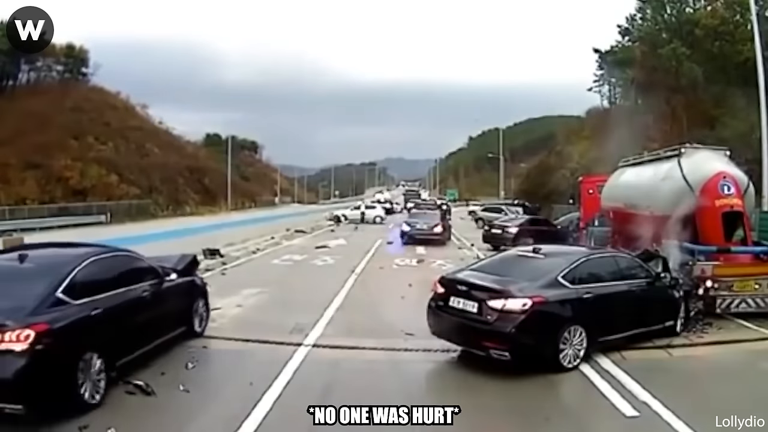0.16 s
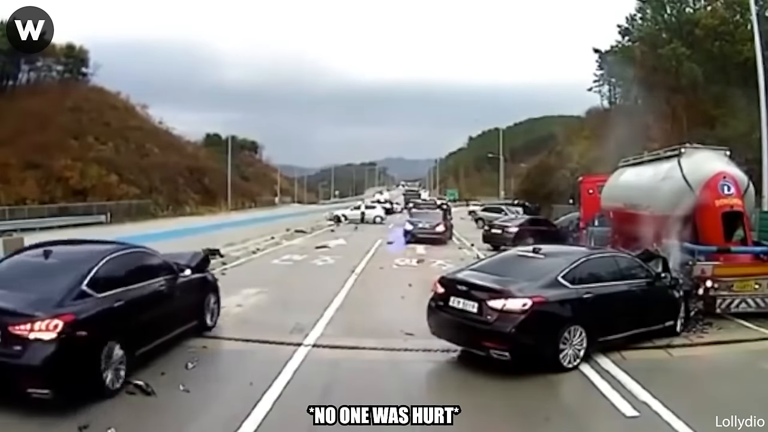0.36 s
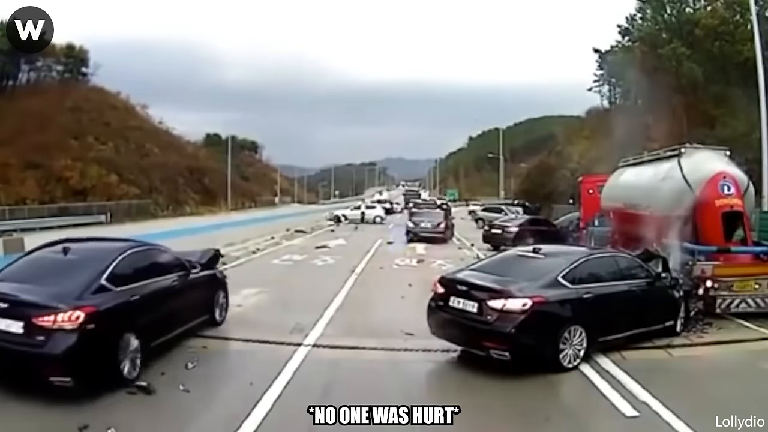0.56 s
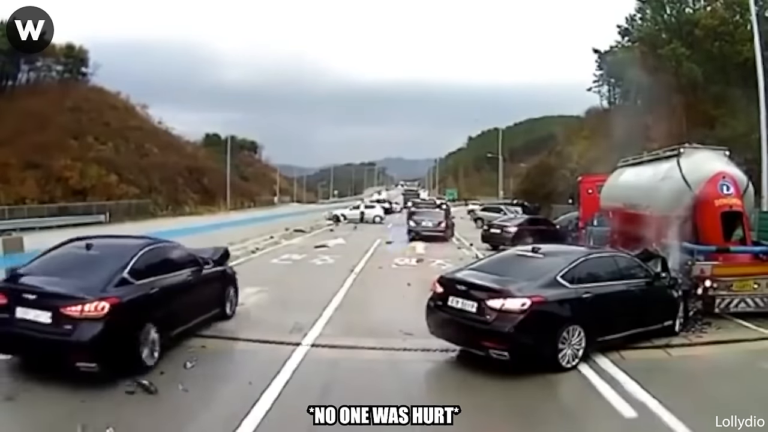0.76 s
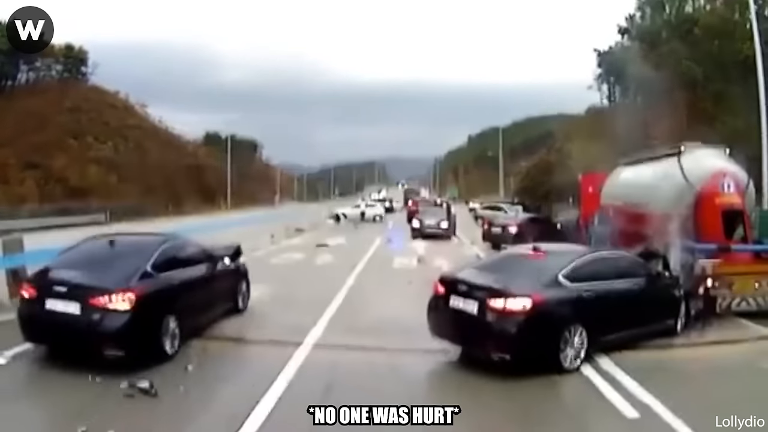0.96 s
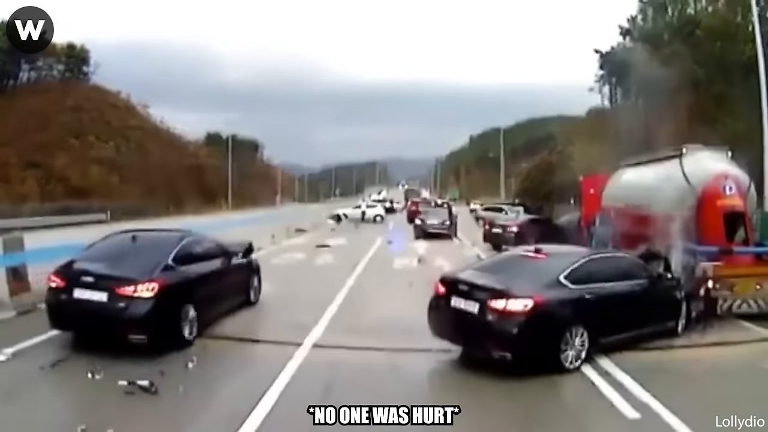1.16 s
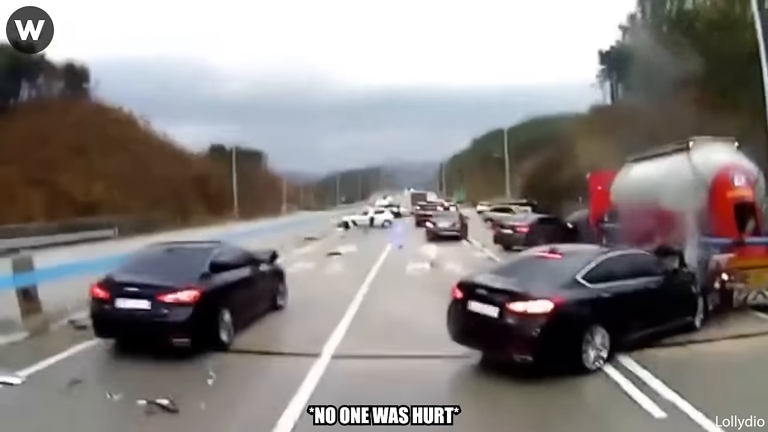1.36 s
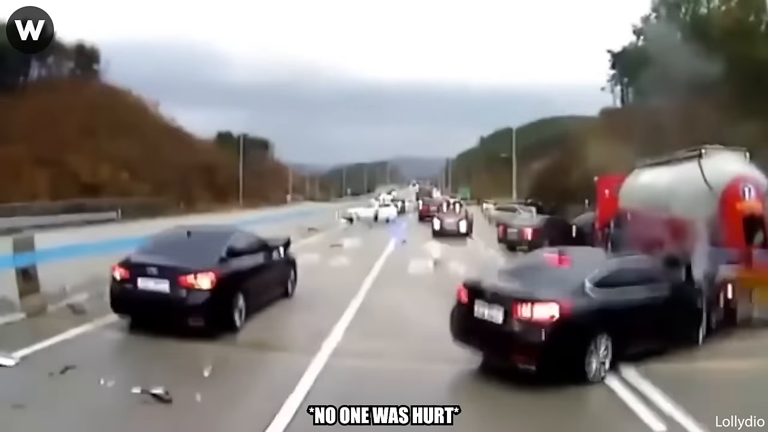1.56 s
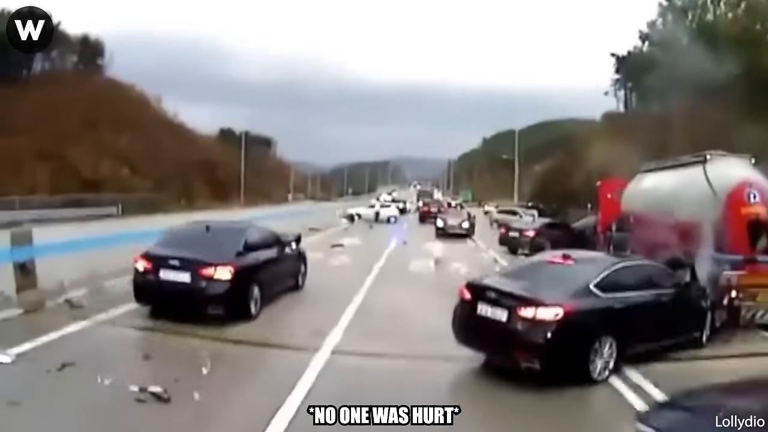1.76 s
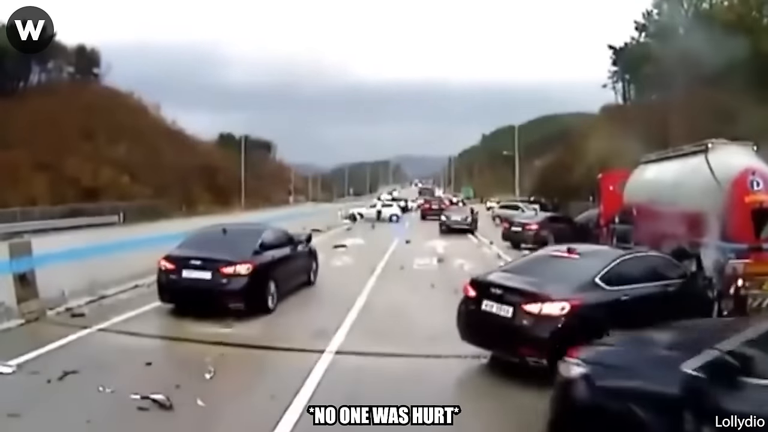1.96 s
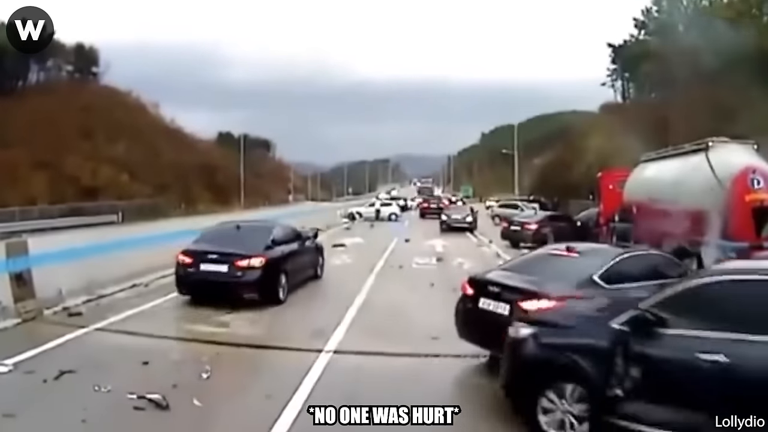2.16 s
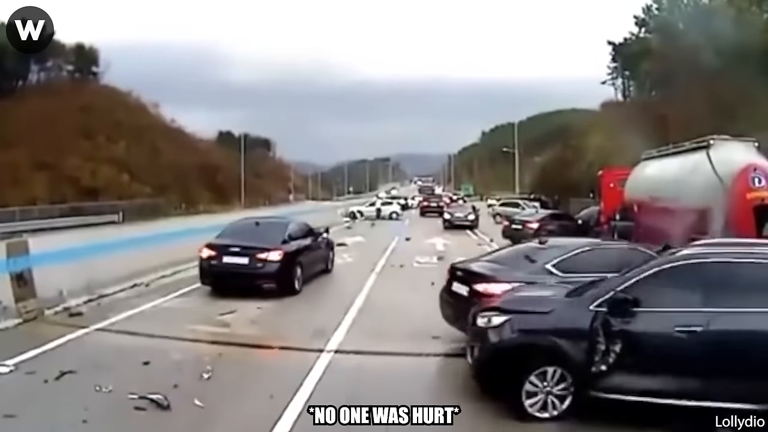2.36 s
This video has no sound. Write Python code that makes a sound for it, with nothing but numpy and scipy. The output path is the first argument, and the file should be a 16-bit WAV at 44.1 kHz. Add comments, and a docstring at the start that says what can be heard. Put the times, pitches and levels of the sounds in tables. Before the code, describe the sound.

Car tyres squeal in a locked-wheel skid on asphalt, then a crash with crumpling metal and shattering glass

```python
"""A car slides with locked wheels, then crashes. Over faint hiss, coloured noise and grit make the scrub and
rumble of rubber on asphalt; a small clack rings a few modes. Tread blocks then stick and slip: wavering
partials give a high tyre, a bright squeal, a low hoarse tyre and short squeaks, with a dull noise-tail echo.
The slide dies away. The crash is banded noise for the panels, struck modes for the body, and single
thuds and ringing shards within a shower of glass."""
import sys
import numpy as np
from scipy import signal
from scipy.io import wavfile
from scipy.ndimage import uniform_filter1d

SR = 44100
rng = np.random.default_rng(int(sys.argv[2]) if len(sys.argv) > 2 else 0)


def persist_wave(psi):
    """Save psi, clipped to +-1, as 16-bit WAV."""
    counts = np.round(np.clip(psi, -1, 1) * 32767).astype(np.int16)
    wavfile.write(sys.argv[1], SR, np.atleast_2d(counts).T)


def ratio_of_db(decibels):
    """Turn decibels (scalar or array-like) into linear amplitude factors; 0 dB maps to 1."""
    return 10 ** (np.asarray(decibels, float) / 20)


N = 110250

# background hiss: (frequency [Hz], relative density [dB per Hz])
HISS_COLOUR = [(18, -30), (30, 0), (71, -34), (180, -34), (1380, -36), (6660, -43.5), (8940, -63.5),
               (10600, -50), (13800, -100), (22000, -120)]
# scrub of rubber: (time [s], mid level before SCRUB_MID_GAIN_DB [dB], treble level [dB])
SCRUB_LEVELS = [(.045, -47, -54), (.085, -48, -59), (.11, -33, -50.5), (.25, -28, -37.5), (.31, -30.5, -42),
                (.55, -30, -40), (.83, -30, -37), (1.05, -29, -42.5), (1.28, -33.5, -51), (1.44, -35, -47),
                (1.54, -36, -49.5), (1.6, -49, -61), (1.65, -65, -73), (1.7, -53, -62)]
# scrub spectrum: (frequency [Hz], relative density [dB per Hz])
SCRUB_COLOUR = [(35, -59), (60, -6.5), (267, -7.5), (450, -6), (558, -3), (693, -2.5), (1000, -5),
                (1480, -8), (1920, -7), (2490, -8.5), (5090, -19.5), (10600, -51.5), (13800, -74.5),
                (22000, -120)]
# rumble of the carcass: (time [s], level [dB])
RUMBLE_LEVELS = [(0.04, -55), (0.094, -43), (0.118, -41), (0.206, -35.5), (0.658, -37), (1.08, -34),
                 (1.278, -41.5), (1.532, -41), (1.56, -45.5), (1.7, -45)]
# knock before the tyres sound: (time [s], relative level [dB])
CLACK_HITS = [(.047, -22)]
# modes of the knock: (frequency [Hz], relative level [dB], T60 [s])
CLACK_MODES = [(1097, -17.5, 0.14), (1360, -18.5, 0.16), (2170, -22, 0.072), (3130, -3.5, 0.036),
               (3310, -5, 0.052), (5130, -26, 0.069), (5600, -35, 0.044)]
# higher tyre: (time [s], slip pitch before detuning [Hz], relative level [dB])
HIGH_TYRE = [(0.15, 846.6, -33.5), (0.28, 1085, -24), (0.33, 1076, -28), (0.346, 1067, -24),
             (0.38, 1021, -43), (0.412, 1080, -21.5), (0.5, 999, -32.5), (0.55, 1000, -34),
             (0.632, 978, -29), (0.676, 972, -32), (0.764, 946.4, -23), (0.834, 1007, -36),
             (0.862, 984, -23.5), (0.99, 862.7, -26), (1.014, 865, -33), (1.064, 904, -24.5),
             (1.274, 923.4, -25), (1.366, 947, -27), (1.45, 945, -26.5), (1.5, 867.6, -26),
             (1.612, 843, -27), (1.64, 843, -39), (1.7, 843, -53)]
# its 2nd to 4th partials: (level against the 1st [dB])
HIGH_OVERTONES_DB = [-9.5, -13.5, -29]
# its tread bands: (pitch ratio, gain [dB])
HIGH_DETUNE = [(.93, -13.5), (1.001, -1.5), (1.1, -7.5)]
# upper squeal: (time [s], pitch before detuning [Hz], relative level [dB])
SQUEAL = [(0.085, 1607, -49), (0.107, 1573, -19), (0.124, 1495, -22), (0.128, 1960, -37),
          (0.147, 1960, -25), (0.261, 1945, -26.5), (0.279, 2014, -33), (0.401, 1780, -29),
          (0.437, 1762, -29), (0.459, 1767, -22.5), (0.627, 1914, -40), (0.649, 1944, -24.5),
          (0.917, 1940, -24.5), (1.021, 1790, -24.5), (1.071, 1870, -23.5), (1.125, 1801, -21),
          (1.315, 1928, -26), (1.323, 1918, -17), (1.365, 1978, -24), (1.591, 1772, -23.5),
          (1.635, 1793, -46), (1.71, 1894, -51)]
# its tread bands: (pitch ratio, gain [dB])
SQUEAL_DETUNE = [(.93, -9.5), (1.001, -7), (1.07, -8.5)]
# low tyre first grips, pitch falling: (time [s], slip pitch [Hz], relative level [dB])
BITE = [(.07, 760, -49), (.09, 760.6, -31), (.1, 733.6, -23), (.114, 686, -27.5), (.13, 654, -10)]
# low tyre sliding: (time [s], slip pitch [Hz], relative level [dB])
LOW_TYRE = [(0.145, 582, -18.5), (0.383, 582, -22), (0.409, 586, -34), (0.443, 565, -26.5),
            (0.481, 583, -36), (0.595, 585, -18), (0.633, 592, -29.5), (0.719, 562, -22.5),
            (0.751, 583, -27), (0.837, 595, -19.5), (0.863, 592, -30), (1.053, 585, -31.5),
            (1.165, 601, -44), (1.335, 563, -28), (1.425, 564, -41), (1.525, 604, -36), (1.58, 572, -34.5),
            (1.7, 563, -54)]
# its 2nd to 4th partials: (level against the table level [dB])
LOW_OVERTONES_DB = [-17, -15.5, -22.5]
# short squeaks and gliding overtones of the tyres: (start [s], length [s], from [Hz], to [Hz], level [dB])
SQUEAKS = [(0.163, 0.03, 1737, 1700, -30), (.21, 0.027, 2123, 2280, -29), (0.237, 0.019, 1850, 1920, -21),
           (.25, 0.059, 2030, 2360, -29.5), (.32, 0.051, 2270, 2212, -36),
           (0.339, 0.048, 1660, 1593, -28.5), (0.449, 0.042, 1740, 1907, -28),
           (0.503, .06, 1735, 1704, -34), (0.694, 0.033, 2090, 2025, -31), (0.946, 0.072, 830, 782, -30),
           (1.09, 0.074, 1684, 1626, -27.5), (1.14, .05, 847, 800, -26.5), (1.528, 0.061, 1850, 1763, -29),
           (1.533, 0.037, 4460, 4550, -53)]
# crash, all but glass before CRUMPLE_GAIN_DB: (time [s], mid [dB], boom [dB], treble [dB], top [dB])
CRASH_LEVELS = [(1.716, -22, -16.5, -27.5, -44), (1.742, -21, -26, -26.5, -42.5),
                (1.822, -24, -24.5, -28.5, -38.5), (1.836, -20.5, -29, -22, -30),
                (1.874, -24, -23.5, -22, -27), (1.956, -20, -26.5, -23.5, -31.5),
                (2.004, -22.5, -26.5, -25, -26.5), (2.154, -26.5, -25, -28, -34.5),
                (2.172, -26.5, -25.5, -26.5, -33.5), (2.252, -23, -25.5, -26, -30),
                (2.34, -26.5, -25.5, -26, -27.5), (2.37, -26.5, -25, -29, -32),
                (2.486, -26, -26, -28, -36.5), (2.5, -27, -23.5, -25.5, -36)]
# crumpling spectrum: (frequency [Hz], relative density [dB per Hz])
CRASH_COLOUR = [(24, -47), (40, -66), (93, -2.5), (220, -5.5), (487, -1), (560, -2), (1160, -2.5),
                (1840, -6.5), (2120, -11.5), (5790, -21), (9230, -36.5), (10600, -24), (13800, -77),
                (22000, -120)]
# modes of the car body: (frequency [Hz], relative level [dB], T60 [s])
BODY_MODES = [(185, -3.5, 0.27), (234.3, 5, 0.15), (292, -3.5, 0.08), (346.4, -1.5, 0.13),
              (413, -4.5, 0.07), (493, -13, 0.12), (687, 0.5, 0.065), (859, 1.5, 0.068), (1003, -10, 0.066)]
# loudest thuds of the body: (time [s], frequency [Hz], peak [dB], shaken for [s])
THUDS = [(1.719, 368, -25, 0.02), (1.777, 372, -26, 0.06), (1.825, 462, -22, 0.018),
         (1.85, 180, -23.5, 0.039), (1.948, 188, -21, 0.011), (2.029, 195, -22, 0.022),
         (2.16, 238, -19.5, 0.014), (2.19, 317, -20, 0.024), (2.36, 203, -23.5, 0.033),
         (2.46, 340, -26, .02)]
# loudest ringing shards: (time [s], frequency [Hz], peak [dB], shaken for [s])
SHARDS = [(1.75, 1644, -27, .02), (1.853, 3800, -22, 0.0074), (1.876, 2620, -30, .008),
          (1.895, 2340, -31, .02), (1.972, 3390, -23.5, 0.017), (1.972, 2870, -30, 0.045),
          (1.99, 5750, -30, 0.043), (2.03, 2096, -25.5, 0.054), (2.175, 2704, -29, 0.028),
          (2.228, 2700, -26.5, 0.0092), (2.245, 4930, -33, 0.022), (2.26, 2260, -29, 0.016),
          (2.29, 1940, -31, .04), (2.315, 5010, -32, 0.026), (2.345, 3700, -31.5, 0.027)]
# treble that spreads wide: (from [s], to [s])
WIDE_SPANS = [(.09, .2), (0.242, 1.5), (1.711, 2.6)]
# faint air above the cut: (band edge [Hz])
AIR_HZ = [10900, 14300]
# steady offset, one row per channel, left then right: (offset [full scale])
OFFSET = [
    [.0188],
    [.0032],
]

HISS_DB = -53
SCRUB_MID_GAIN_DB, RUMBLE_TOP_HZ, SCRUB_TREBLE_FROM_HZ = 6, 490, 5000
CLACK_GAIN_DB = 1.0
SLIDE_END_S, SLIDE_FADE_S = 1.71, 0.033
ECHO_DB, ECHO_T60_S, ECHO_TOP_HZ = -16.5, 0.28, 2930
CRASH_S, CRUMPLE_GAIN_DB, BOOM_RISE_S = 1.7125, -1.0, 0.038
BOOM_TOP_HZ, TREBLE_FROM_HZ, TOP_FROM_HZ = 550, 2000, 4500
BODY_DB, BODY_BLOWS_PER_S = -27.5, 110
GLASS_PER_S, GLASS_CYCLES = 1200, 130   # T60 of a shard in cycles
GLASS_DB = -6   # against the treble level in CRASH_LEVELS
GLASS_TILT_DB = -3.5   # across the pitch range, low to high
SHARD_T60_S, THUD_T60_S, MODE_WANDER_HZ = 0.045, 0.057, 8
CUTOFF_HZ = 11240
WIDE_HZ, WIDE_DB = [4340, 7530], -2.5   # side against middle
WIDE_PATCHY = 0.99   # a slice fades out as its slow chance nears this
AIR_DB, AIR_HISS_DB = -24.5, -73   # against the band below the cut; absolute


def rms_one(x):
    """Scale to rms 1."""
    return x / np.sqrt(np.mean(x ** 2) + 1e-20)


def in_time(rows):
    """Columns of a table, one value per sample."""
    s, *columns = np.transpose(rows)
    return [np.interp(np.arange(N) / SR, s, c) for c in columns]


def between(start_s, end_s, fade_s):
    """Gate with short straight fades."""
    t = np.arange(N) / SR
    return np.clip(np.minimum(t - start_s, end_s - t) / fade_s, 0, 1)


def drift(rate_hz):
    """Slow chance of spread 1: noise through a two-pole low-pass."""
    r = np.exp(-2 * np.pi * rate_hz / SR)
    noise = rng.standard_normal(N + SR)   # first second settles the filter
    return rms_one(signal.lfilter([1], [1, -2 * r, r * r], noise)[SR:])


def band_pass(x, order, edges_hz):
    """Butterworth band-pass."""
    return signal.sosfilt(signal.butter(order, edges_hz, "band", fs=SR, output="sos"), x)


def ring(clicks, hz, t60_s):
    """Resonator: a unit click sets a sine of height 1 ringing."""
    r = ratio_of_db(-60 / (t60_s * SR))
    w = 2 * np.pi * hz / SR
    return signal.lfilter([0, np.sin(w)], [1, -2 * r * np.cos(w), r * r], clicks + 1e-18)


def grains(per_s, spread_db):
    """Random clicks of uneven size and sign."""
    sizes = ratio_of_db(spread_db * np.minimum(rng.exponential(1, N), 3)) * rng.choice([-1, 1], N)
    return sizes * (rng.random(N) < per_s / SR)


def gritty_noise(grain_gain):
    """Two white noises strewn with clicks."""
    return rng.standard_normal((2, N)) + grain_gain * np.array([grains(1500, 4), grains(1500, 4)])


def bands(x, colour, patchy_db, rate_hz):
    """Third-octave bands dealt in turn from two sources, each with its level and flicker."""
    edges = 30 * 2 ** np.arange(0, 9.1, 1 / 3)
    centres = np.sqrt(edges[1:] * edges[:-1])
    colour_hz, colour_db = np.transpose(colour)
    level_db = np.interp(np.log(centres), np.log(colour_hz), colour_db)
    parts = [ratio_of_db(level_db[k] + patchy_db * drift(rate_hz)) * band_pass(x[k % 2], 2, edges[k:k + 2])
             for k in range(len(centres))]
    return centres, np.array(parts)


def registers(centres, parts, layers):
    """Sum the bands in registers (from Hz, to Hz, level dB), each levelled on its own."""
    out = 0
    for low_hz, high_hz, db in layers:
        inside = (centres >= low_hz) & (centres < high_hz)
        out = out + ratio_of_db(db) * rms_one(parts[inside].sum(axis=0))
    return out


def slip(hz, partials_db, wobble, rough, flutter_db):
    """Stick-slip of tread blocks: partials on one wavering phase, each fluttering in strength."""
    waver = 1 + wobble * drift(25.3) + rough * drift(143.9)
    phase = 2 * np.pi * np.cumsum(hz * waver) / SR
    out = 0
    for k, db in enumerate(partials_db, start=1):
        flutter = flutter_db * np.minimum(drift(31), 0.8)
        out = out + np.sqrt(2) * ratio_of_db(db + flutter) * np.sin(k * phase)
    return out


def shaken(start_s, hz, db, length_s, t60_s):
    """One mode kept ringing unevenly while shaken, then dying."""
    t = np.arange(N) / SR
    decay_db = 60 * np.maximum(t - start_s - length_s, 0) / t60_s
    rise = between(start_s, 3, 1.5 / hz + 0.0019)
    phase = 2 * np.pi * np.cumsum(hz + MODE_WANDER_HZ * drift(40)) / SR
    return rise * ratio_of_db(db + 2.0 * drift(34) - decay_db) * np.sin(phase)


def noise_following(x, from_hz, to_hz, count, patchy):
    """Noise in band to_hz follows, slice by slice, the level of x in from_hz; slices come and go."""
    out = 0
    heard_edges = np.geomspace(*from_hz, num=count + 1)
    noise_edges = np.geomspace(*to_hz, num=count + 1)
    for k in range(count):
        heard = band_pass(x, 4, heard_edges[k:k + 2])
        noise = band_pass(rng.standard_normal(N), 6, noise_edges[k:k + 2])
        on = np.clip(4 * (patchy - drift(2.5)), 0, 1)
        level = np.sqrt(np.abs(uniform_filter1d(heard ** 2, size=700)))
        out = out + on * level * rms_one(noise)
    return out


def background_hiss():
    """Faint flickering noise under everything."""
    _, parts = bands(rng.standard_normal((2, N)), HISS_COLOUR, patchy_db=3.0, rate_hz=7.2)
    return ratio_of_db(HISS_DB) * rms_one(parts.sum(axis=0))


def scrub():
    """Dense grit tearing under the rubber, and the rumble of the carcass."""
    mid_db, treble_db = in_time(SCRUB_LEVELS)
    rumble_db, = in_time(RUMBLE_LEVELS)
    centres, parts = bands(gritty_noise(0.22), SCRUB_COLOUR, patchy_db=2.0, rate_hz=15.5)
    layers = [(0, RUMBLE_TOP_HZ, rumble_db),
              (RUMBLE_TOP_HZ, SCRUB_TREBLE_FROM_HZ, mid_db + SCRUB_MID_GAIN_DB + 0.9 * drift(5.9)),
              (SCRUB_TREBLE_FROM_HZ, SR, treble_db)]
    return between(0.042, CRASH_S, 0.007) * registers(centres, parts, layers)


def clack():
    """A small knock: a click rings the modes, softened by a fade-in of about a millisecond."""
    clicks = np.zeros(N)
    for s, db in CLACK_HITS:
        clicks[int(s * SR)] = ratio_of_db(db + CLACK_GAIN_DB)
    rings = sum(ratio_of_db(db) * ring(clicks, hz, t60_s) for hz, db, t60_s in CLACK_MODES)
    return rings * between(CLACK_HITS[0][0], 3, 0.0014)


def squeal():
    """Bright stick-slip of several tread bands, about an octave above the higher tyre."""
    hz, db = in_time(SQUEAL)
    out = sum(slip(hz * ratio, [db + gain, db + gain - 39.5], wobble=0.024, rough=0.02024, flutter_db=7.5)
              for ratio, gain in SQUEAL_DETUNE)
    return between(0.069, CRASH_S, 0.0036) * out


def high_tyre():
    """Stick-slip of a higher tyre in several detuned tread bands."""
    hz, db = in_time(HIGH_TYRE)
    out = 0
    for ratio, gain in HIGH_DETUNE:
        partials_db = [db + gain + o for o in [0] + list(HIGH_OVERTONES_DB)]
        out = out + slip(hz * ratio, partials_db, wobble=0.027, rough=0.0281, flutter_db=1)
    return between(0.07, 3, 0.024) * between(0.069, CRASH_S, 0.0036) * out


def low_tyre():
    """Stick-slip of one tyre that bites, then groans low and fairly steady."""
    hz, db = in_time(list(BITE) + list(LOW_TYRE))
    partials_db = [db - 1] + [db + o for o in LOW_OVERTONES_DB]
    groan = slip(hz, partials_db, wobble=0.017, rough=0.03, flutter_db=3)
    return between(0.09, CRASH_S, 0.0029) * groan


def squeaks():
    """Short squeaks and gliding overtones of the tyres, each one rough partial."""
    t = np.arange(N) / SR
    out = 0
    for s, length_s, from_hz, to_hz, db in SQUEAKS:
        hz = np.interp(t, [s, s + length_s], [from_hz, to_hz])
        glide = slip(hz, [db], wobble=0.004, rough=0.016, flutter_db=3.5)
        out = out + between(s, s + length_s, 0.0072) * glide
    return out


def roadside(x):
    """Diffuse roadside echo: dull, dying noise smears the tyres."""
    t = np.arange(SR // 2) / SR
    tail = rng.standard_normal(len(t)) * ratio_of_db(-60 * t / ECHO_T60_S) * (t > 0.015)
    tail = band_pass(tail, 2, [300, ECHO_TOP_HZ])
    tail = tail / np.sqrt(np.sum(tail ** 2))
    return ratio_of_db(ECHO_DB) * signal.fftconvolve(x, tail)[:N] * between(-1, CRASH_S, 0.004)


def crumpling():
    """Panels crumple: gritty noise in four registers, the boom swelling in."""
    mid_db, boom_db, treble_db, top_db = in_time(CRASH_LEVELS)
    swell_db = -12 * (1 - between(CRASH_S, 3, BOOM_RISE_S))
    centres, parts = bands(gritty_noise(0.2), CRASH_COLOUR, patchy_db=1.0, rate_hz=48)
    layers = [(0, BOOM_TOP_HZ, boom_db + swell_db), (BOOM_TOP_HZ, TREBLE_FROM_HZ, mid_db),
              (TREBLE_FROM_HZ, TOP_FROM_HZ, treble_db), (TOP_FROM_HZ, SR, top_db)]
    return ratio_of_db(CRUMPLE_GAIN_DB) * registers(centres, parts, layers)


def body_blows():
    """Random blows ring the modes of the car body."""
    body = sum(ratio_of_db(db) * ring(grains(BODY_BLOWS_PER_S, 3.0), hz, t60_s) for hz, db, t60_s in BODY_MODES)
    return between(CRASH_S, 3, BOOM_RISE_S) * ratio_of_db(BODY_DB) * rms_one(body)


def glass_shower():
    """Random clicks dealt among 30 ringing pitches, following the crash treble."""
    treble_db = in_time(CRASH_LEVELS)[2]
    pitches_hz = np.geomspace(1800, 9000, num=30)
    dealt = rng.integers(0, 30, N)
    bits = grains(GLASS_PER_S, 4.1)
    glass = sum(ratio_of_db(GLASS_TILT_DB * k / 30) * ring(bits * (dealt == k), hz, GLASS_CYCLES / hz)
                for k, hz in enumerate(pitches_hz))
    return ratio_of_db(treble_db + GLASS_DB) * rms_one(glass)


def crash():
    """Panels, body and glass start together; single thuds and shards stand out."""
    out = between(CRASH_S, 3, 0.0018) * (crumpling() + body_blows() + glass_shower())
    thuds = sum(shaken(*row, THUD_T60_S) for row in THUDS)
    shards = sum(shaken(*row, SHARD_T60_S) for row in SHARDS)
    return out + thuds + shards


def scene():
    """All sources in the middle over a faint hiss."""
    tyres = squeal() + high_tyre() + low_tyre() + squeaks()
    tyres = tyres * between(-1, SLIDE_END_S, SLIDE_FADE_S)
    mono = background_hiss() + scrub() + clack() + tyres + roadside(tyres) + crash()
    return np.array([mono, mono])


def faint_air(x):
    """Patchy noise above the cut follows the band below it, over steady hiss."""
    air = noise_following(x, [8000, 10000], AIR_HZ, count=3, patchy=0.6)
    hiss = rms_one(band_pass(rng.standard_normal(N), 6, AIR_HZ))
    return ratio_of_db(AIR_DB) * air + ratio_of_db(AIR_HISS_DB) * hiss


def wide_treble(x):
    """Noise following part of the treble, in opposite phase left and right."""
    gate = sum(between(start_s, end_s, 0.029) for start_s, end_s in WIDE_SPANS)
    side = gate * noise_following(x, WIDE_HZ, WIDE_HZ, count=5, patchy=WIDE_PATCHY)
    return ratio_of_db(WIDE_DB) * side * [[1], [-1]]


def top_cut(x):
    """Nothing passes above the cut-off."""
    return signal.sosfilt(signal.butter(12, 14500, fs=SR, output="sos"), x)


def record(dry):
    """The top is cut to a faint air, part of the treble spreads wide; a small steady offset."""
    low = signal.sosfilt(signal.cheby2(10, 50, CUTOFF_HZ, fs=SR, output="sos"), dry)
    mix = low + faint_air(low[0]) + wide_treble(low[0]) + OFFSET
    return top_cut(mix)


dry = scene()
out = record(dry)
persist_wave(out)
```